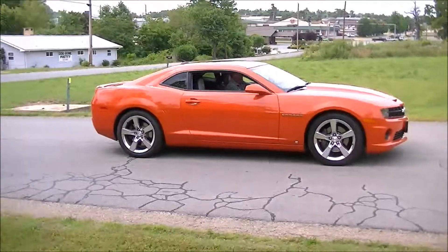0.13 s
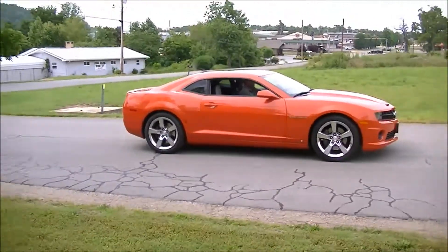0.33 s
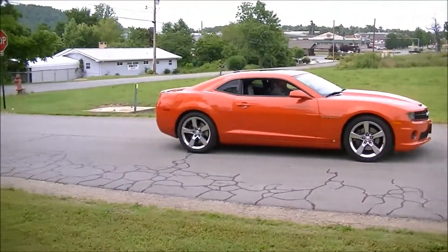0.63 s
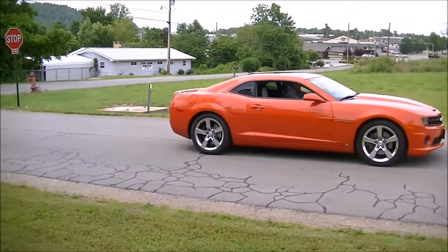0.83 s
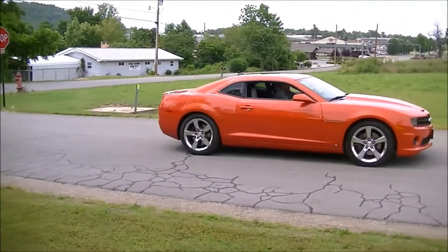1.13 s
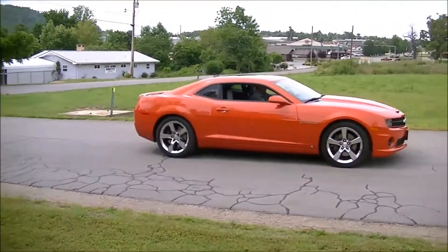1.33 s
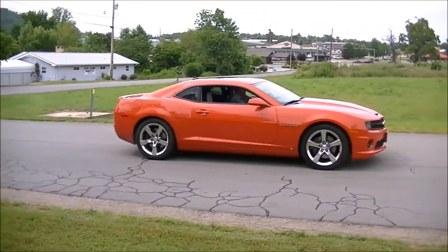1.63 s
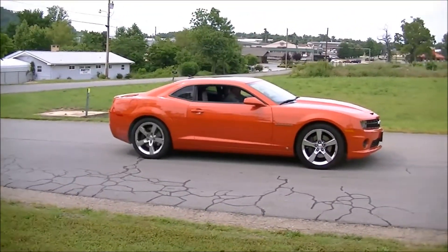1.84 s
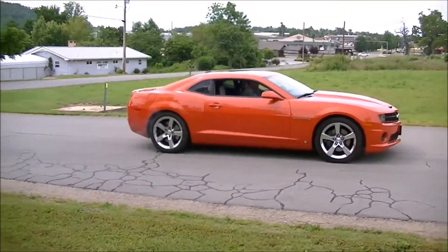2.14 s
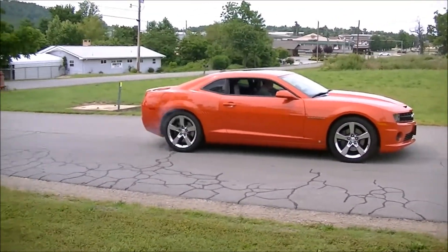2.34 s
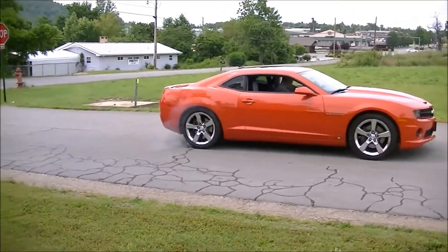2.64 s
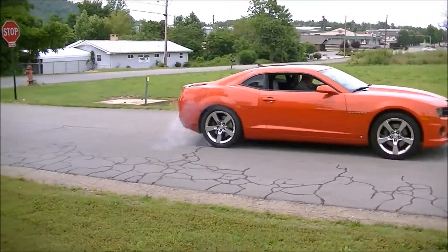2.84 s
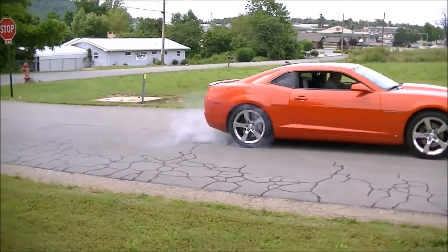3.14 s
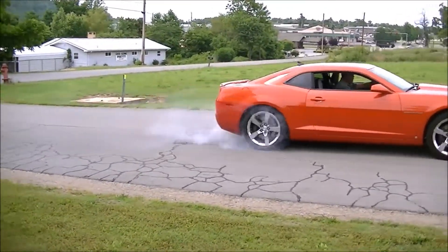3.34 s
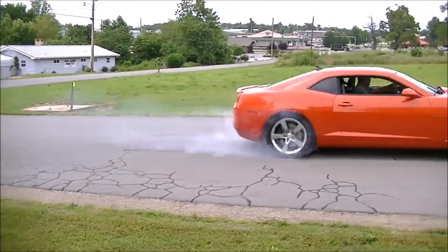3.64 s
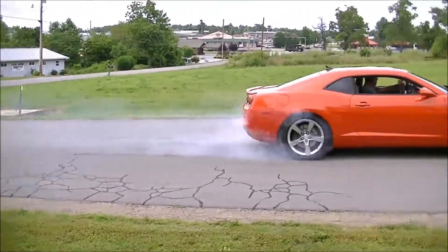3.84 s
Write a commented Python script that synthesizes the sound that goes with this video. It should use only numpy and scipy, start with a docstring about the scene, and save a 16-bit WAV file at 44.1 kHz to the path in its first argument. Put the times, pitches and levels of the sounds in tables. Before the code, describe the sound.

A powerful car engine revs up to a roar while its spinning tyres howl on asphalt

```python
"""Roadside, asphalt: an eight-cylinder car launches with its rear tyres spinning.
The engine, cycle-locked tones and firing-pulsed gas noise, leaves idle, is held back while the tyres break
loose, races to the limit and drops at the gear change. The rubber howls near 1.1 kHz (coloured noise, climbing
squeals, short strands) and scrubs the road (bright noise). A pipe boom and a drone are resonant noise, distant
traffic is coloured noise, and small ticks before the launch are struck modes."""
import sys
import numpy as np
from scipy import signal
from scipy.fft import rfft, irfft
from scipy.io import wavfile

SR = 44100
rng = np.random.default_rng(int(sys.argv[2]) if len(sys.argv) > 2 else 0)


def to_linear_factor(level_db):
    """Convert decibel levels (scalar or array-like) to linear amplitude factors."""
    exponent = np.asarray(level_db, float) / 20
    return 10 ** exponent


def unload_audio(sound):
    """Save the sound as a 16-bit wav file, at the path given as the first command line argument."""
    columns = np.transpose(np.atleast_2d(sound))
    # keep every value between -1 and 1, then stretch to whole-number steps
    steps = np.round(np.clip(columns, -1, 1) * 32767)
    wavfile.write(sys.argv[1], SR, steps.astype(np.int16))


N = 176400

# Distant traffic spectrum. Each row: frequency in Hz, relative level in dB per Hz.
TRAFFIC_SPECTRUM = [(50, -34), (120, -15), (300, -10.5), (718, -16.5), (1000, -8), (1800, -11.5),
                    (2600, -20.5), (11000, -35.5), (15500, -48)]
TRAFFIC_DB = -39.5

# Ticks. Each row: start in seconds, level in dB, brightness in dB per octave about 4 kHz.
TICKS = [(0.3616, -22, 2), (0.4117, -32.5, 4)]
# Modes of a tick. Each row: frequency in Hz, level in dB, t60 in seconds.
TICK_MODES = [(1620, -2.5, 0.014), (3050, 3, 0.010), (4300, -0.5, 0.004), (6200, -2, 0.0029),
              (8600, -14, 0.0024), (11500, -21, 0.003)]
TICK_BOUNCE_S = 0.00073

# Pipe resonance, booming at idle and as the throttle opens. Each row: time in seconds, level in dB.
BOOM_LEVEL = [(.15, -53.5), (.88, -40.5), (.93, -30), (1.1, -29), (1.5, -40)]
BOOM_HZ, BOOM_WIDTH_HZ = 370, 100  # width of one pass
# Narrow drone, fixed pitch under load. Each row: time in seconds, level in dB.
DRONE_LEVEL = [(1.88, -55), (2.0, -37), (2.55, -42), (2.75, -55)]
DRONE_HZ, DRONE_WIDTH_HZ = 485, 30

# Engine speed. Each row: time in seconds, full cycles per second in Hz.
ENGINE_SPEED = [(.9, 9.23), (1.04, 12.4), (1.14, 15.0), (1.51, 18.8), (2.02, 22.4), (2.46, 26.6),
                (2.59, 28.9), (2.89, 38.1), (3.22, 47.8), (3.55, 51.3), (3.72, 51.5), (4, 37.4)]
# Engine effort, ahead of the car's fade-in. Each row: time in seconds, firing tone in dB, gas noise in dB.
ENGINE_EFFORT = [(.89, -52, -47), (.94, -40, -33.5), (1.04, -40, -32.5), (1.14, -36, -33.5),
                 (1.75, -44, -35), (1.92, -65, -32), (2.1, -39, -29.5), (2.47, -38, -35),
                 (2.89, -34.5, -33), (3.3, -33, -44.5), (3.72, -33, -31), (3.86, -24.5, -30.5),
                 (4, -31, -27.5)]
# Uneven banks: tones on multiples 2, 3, .. 15 of the cycle. Each entry: level in dB at 50 cycles per second.
LOW_ORDERS_DB = [-46, -40, -49, -39.5, -46, -38, -60, -31, -36, -39, -35, -43, -39, -43]
LOW_ORDERS_DB_PER_OCTAVE = 1.3  # of speed, per unit of the multiple; a third of it from the 10th up
# Tones on multiples 16, 17, .. 24. Each entry: level in dB, ahead of the held-back gain.
HIGH_ORDERS_DB = [-31, -41, -33, -46, -38, -46, -39, -48, -39]
# Gain of the high orders, strong while the engine is held back. Each row: time in seconds, gain in dB.
HELD_BACK = [(.98, -5), (1.25, 1), (1.9, 0), (3.0, -10)]
TONES_WAVER_DB = 1.3
# Gain of pipe and road for the tones. Each row: frequency in Hz, gain in dB.
PIPE_GAIN = [(50, -22), (90, -3), (140, 0), (520, 0), (800, -16)]
# Turbulent exhaust gas. Each row: frequency in Hz, relative level in dB per Hz.
GAS_SPECTRUM = [(60, -50), (130, -30), (390, -14), (490, -1), (660, -15), (6000, -60)]
GAS_PULSE_DEPTH = 0.55

# Rear tyres, ahead of the car's fade-in. Each row: time in seconds, howl in dB, scrub in dB.
TYRE_LEVELS = [(.5, -40, -43), (.91, -35.5, -39.5), (1.025, -24.5, -27.5), (1.065, -34.5, -40),
               (1.13, -25, -29.5), (1.95, -19.5, -26.5), (2.5, -20.5, -28.5), (3.0, -20, -25),
               (3.63, -20, -23), (4, -20, -25.5)]
# Broad howl. Each row: frequency in Hz, relative level in dB per Hz.
HOWL_SPECTRUM = [(700, -35.5), (800, -8), (900, -4.5), (1080, 0.5), (1390, -3), (1670, -13), (2470, -64),
                 (4180, -120)]
# Rubber on asphalt. Each row: frequency in Hz, relative level in dB per Hz.
SCRUB_SPECTRUM = [(880, -48), (1500, -7), (2280, -5), (2780, -12), (3150, -6), (3760, -17), (4230, -11.5),
                  (5250, -19), (9000, -22), (11500, -28.5), (13200, -35), (15500, -45)]
# The scrub dulls as smoke and distance grow. Each row: time in seconds, tilt in dB per octave above 3 kHz.
SCRUB_TILT = [(1.2, 3.5), (2.1, 1.2), (2.5, -1.5), (4, -2)]
HOWL_FLUTTER_DB, SCRUB_FLUTTER_DB = 0.33, 1.11
# Tread grabs: brief howl jumps. Each row: time in seconds, jump in dB.
GRABS = [(2.462, 5), (3.141, 6)]
GRAB_S = 0.006
ROAD_ECHO_S, ROAD_ECHO_FULL_SHARE, ROAD_ECHO_FULL_UNTIL_S = 0.00102, 0.36, 2.4
# Stick-slip squeals, climbing as the tread heats, then jumping back.
# Each row: start in seconds, length in seconds, start pitch in Hz, level over the howl in dB.
SQUEALS = [(1.53, 0.32, 1010, -3.5), (1.778, 0.28, 1040, -7), (2.09, 0.081, 1260, -14),
           (2.33, 0.5, 1020, -0.5), (2.896, 0.28, 1020, -2), (3.297, 0.37, 1080, -3)]
SQUEAL_CLIMB_HZ_PER_S, SQUEAL_HALF_WIDTH_HZ = 520, 30
STRANDS_PER_S, STRAND_S, STRAND_MIN_DB = 35, 0.035, -7  # dB over the howl
OVERTONES_FROM_S, OVERTONES_DB = 2.7, -7

START_S, START_FADE_S = 0.16, 0.0012
MIC_CUT_HZ = 113


def rms_one(x):
    """Scale to rms 1."""
    return x / np.sqrt(np.mean(x ** 2) + 1e-20)


def in_time(rows):
    """Each column of a table as a curve over the samples."""
    s, *columns = np.transpose(rows)
    return [np.interp(np.arange(N) / SR, s, c) for c in columns]


def colour(x, spectrum):
    """Give x the gain of a (Hz, dB) table; a fading mirror image softens the end."""
    hz, db = np.transpose(spectrum)
    x = np.concatenate([x, x[::-1][:SR] * np.linspace(1, 0, SR)])
    grid_hz = np.arange(len(x) // 2 + 1) * SR / len(x) + 1
    gain = to_linear_factor(np.interp(np.log(grid_hz), np.log(hz), db))
    return irfft(rfft(x) * gain, len(x))[:N]


def coloured_noise(spectrum):
    """Noise of rms 1 with the given spectrum."""
    return rms_one(colour(rng.standard_normal(N), spectrum))


def drift(rate_hz):
    """Random wander of spread 1: noise through two equal poles at rate_hz."""
    r = np.exp(-80 * np.pi * rate_hz / SR)  # runs at SR / 40
    slow = signal.lfilter([1], [1, -2 * r, r * r], rng.standard_normal(N // 40 + 2002))[2000:]
    return np.interp(np.arange(N) / 40, np.arange(len(slow)), rms_one(slow))


def resonant_noise(hz, width_hz):
    """Noise ringing twice through one resonance."""
    r, w = np.exp(-np.pi * width_hz / SR), 2 * np.pi * hz / SR
    zeros, poles = [1, 0, -1], [1, -2 * r * np.cos(w), r * r]
    once = signal.lfilter(zeros, poles, rng.standard_normal(N))
    return rms_one(signal.lfilter(zeros, poles, once))


def traffic():
    """Distant road hum: coloured noise, slightly unsteady."""
    return to_linear_factor(TRAFFIC_DB + 0.58 * drift(26.0)) * coloured_noise(TRAFFIC_SPECTRUM)


def ticks():
    """Short dry ticks, each touching twice and ringing a few quick modes."""
    out = 0
    for k, (hz, mode_db, t60) in enumerate(TICK_MODES):
        clicks = np.full(N, 1e-18)
        for s, db, tilt_db in TICKS:
            touches = [int(s * SR) + 30, int((s + TICK_BOUNCE_S) * SR) + 30]
            clicks[touches] = to_linear_factor(db + mode_db + tilt_db * np.log2(hz / 4000))
        r, w = to_linear_factor(-60 / (t60 * SR)), 2 * np.pi * hz / SR
        sign = (-1) ** k
        out = out + signal.lfilter([0, sign * np.sin(w)], [1, -2 * r * np.cos(w), r * r], clicks)
    return out


def boom():
    """Pipe boom and drone: noise in two resonances."""
    boom_db, = in_time(BOOM_LEVEL)
    drone_db, = in_time(DRONE_LEVEL)
    return (to_linear_factor(boom_db) * resonant_noise(BOOM_HZ, BOOM_WIDTH_HZ)
            + to_linear_factor(drone_db) * resonant_noise(DRONE_HZ, DRONE_WIDTH_HZ))


def engine():
    """Multiples of the cycle through the pipe, the firing tone (8th), and firing-pulsed gas noise."""
    cycle_hz, = in_time(ENGINE_SPEED)
    firing_db, gas_db = in_time(ENGINE_EFFORT)
    held_db, = in_time(HELD_BACK)
    turn = 2 * np.pi * np.cumsum(cycle_hz) / SR

    def tone(multiple, db):
        level = to_linear_factor(db + TONES_WAVER_DB * drift(5.0))
        return level * np.sin(multiple * turn + rng.uniform(0, 2 * np.pi))

    growth_db = LOW_ORDERS_DB_PER_OCTAVE * np.log2(cycle_hz / 50)
    low = sum(tone(m, db + growth_db * m / (1 if m < 10 else 3)) for m, db in enumerate(LOW_ORDERS_DB, 2))
    high = sum(tone(m, db) for m, db in enumerate(HIGH_ORDERS_DB, 16))
    running = np.clip((cycle_hz - 10) / 4.7, 0, 1)  # tones enter with speed
    tones = colour(running * (low + to_linear_factor(held_db) * high), PIPE_GAIN)
    firing = np.sin(8 * turn)
    gas = rng.standard_normal(N) * (1 + GAS_PULSE_DEPTH * firing)
    gas = rms_one(colour(gas, GAS_SPECTRUM))
    return tones + np.sqrt(2) * to_linear_factor(firing_db) * firing + to_linear_factor(gas_db) * gas


def strands():
    """Brief gliding squeals from 0.92 to 1.45 kHz; late on, the lower ones gain partials 2 and 3."""
    out, t = np.zeros(N), np.arange(-.1, .1, 1 / SR)
    for when, pitch, bend, size in rng.random((int(STRANDS_PER_S * N / SR), 4)):
        climb_hz_per_s = -500 + 2000 * bend
        turn = 2 * np.pi * (920 + 530 * pitch + climb_hz_per_s / 2 * t) * t
        i = int(when * (N - len(t)))
        rough = to_linear_factor(OVERTONES_DB) * (i > OVERTONES_FROM_S * SR and pitch < .4)
        swing = np.sin(turn) + rough * (np.sin(2 * turn) + np.sin(3 * turn))
        out[i:i + len(t)] += to_linear_factor(STRAND_MIN_DB + 6 * size) * np.exp(-(t / STRAND_S) ** 2) * swing
    return out


def squeals():
    """Stick-slip: each squeal is a narrow unsteady swing on a climbing pitch."""
    out, t = np.zeros(N), np.arange(N) / SR
    lowpass = signal.butter(2, SQUEAL_HALF_WIDTH_HZ, fs=SR, output="sos")
    for s, length, hz, db in SQUEALS:
        slips = signal.sosfilt(lowpass, rng.standard_normal((2, N)))
        unsteady = (slips[0] + 1j * slips[1]) / np.std(slips)
        since = t - s
        turn = 2 * np.pi * (hz + SQUEAL_CLIMB_HZ_PER_S * since / 2) * since
        shape = np.sqrt(np.sin(np.pi * np.clip(since / length, 0, 1)) + 1e-12)
        out += to_linear_factor(db) * shape * (unsteady * np.exp(1j * turn)).real
    return out


def scrub_noise():
    """Rubber scrub, treble combed by its road echo until the car rolls on, then tilted over time."""
    t = np.arange(N) / SR
    rub = coloured_noise(SCRUB_SPECTRUM)
    band = signal.butter(2, [4500, 10500], "band", fs=SR, output="sos")
    echo = np.roll(signal.sosfiltfilt(band, rub), round(ROAD_ECHO_S * SR))
    fading = np.clip(ROAD_ECHO_FULL_UNTIL_S + 1 - t, .4, 1)
    rub = rub + ROAD_ECHO_FULL_SHARE * fading * echo
    tilt, = in_time(SCRUB_TILT)
    scrub = rub
    for k, hz in enumerate([3000, 4200, 6000, 8500]):  # half-octave steps
        above = signal.sosfiltfilt(signal.butter(1, hz, "high", fs=SR, output="sos"), rub)
        scrub = scrub + (to_linear_factor(tilt * (k + 1) / 2) - to_linear_factor(tilt * k / 2)) * above
    return scrub


def tyres():
    """Spinning rubber: broad howl, squeals and strands, all jumping at the grabs, plus bright scrub."""
    t = np.arange(N) / SR
    howl_db, scrub_db = in_time(TYRE_LEVELS)
    howl = to_linear_factor(HOWL_FLUTTER_DB * drift(47.0)) * coloured_noise(HOWL_SPECTRUM)
    grab_db = sum(db * np.exp(-((t - s) / GRAB_S) ** 2) for s, db in GRABS)
    scrub = to_linear_factor(scrub_db + SCRUB_FLUTTER_DB * drift(27.0)) * scrub_noise()
    return to_linear_factor(howl_db + grab_db) * (howl + squeals() + strands()) + scrub


def scene():
    """The car grows out of the traffic hum; boom and ticks are not faded."""
    car_in = np.clip((np.arange(N) / SR - .4) / 0.72, 0, 1)
    return ((engine() + tyres()) * car_in + boom() + ticks() + traffic())[None]


def roll_off(x):
    """The treble ends steeply here."""
    return signal.sosfilt(signal.butter(12, 15680, fs=SR, output="sos"), x)


def record(dry):
    """Silence until the start; the microphone drops the deep bass."""
    on = dry * np.clip((np.arange(N) / SR - START_S) / START_FADE_S, 0, 1)
    mix = signal.sosfilt(signal.butter(3, MIC_CUT_HZ, "high", fs=SR, output="sos"), on)
    return roll_off(mix)


dry = scene()
out = record(dry)
unload_audio(out)
```